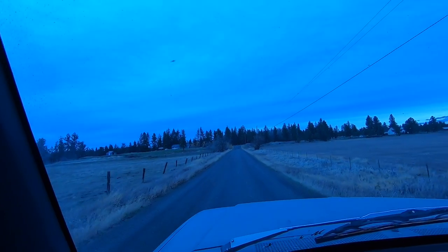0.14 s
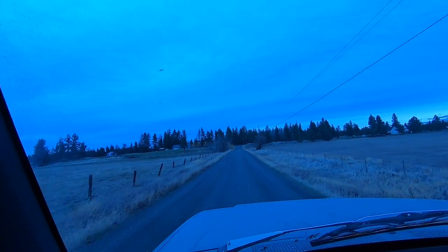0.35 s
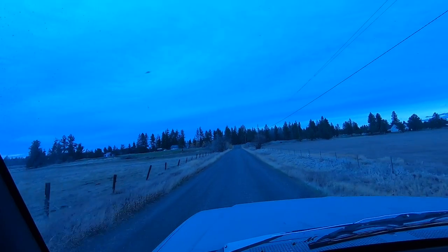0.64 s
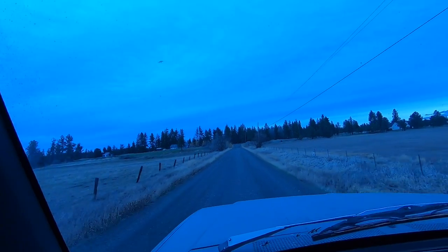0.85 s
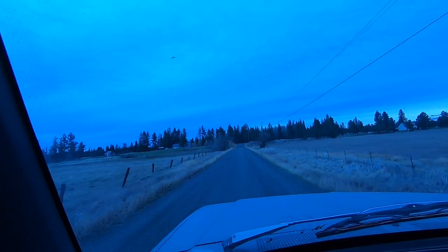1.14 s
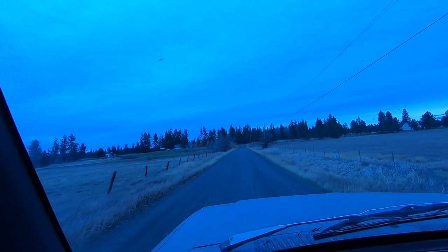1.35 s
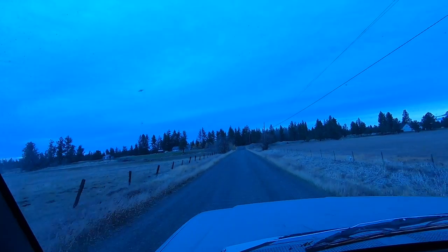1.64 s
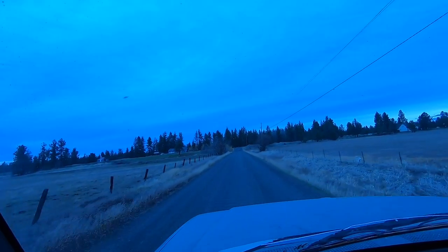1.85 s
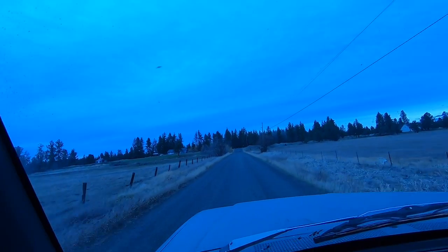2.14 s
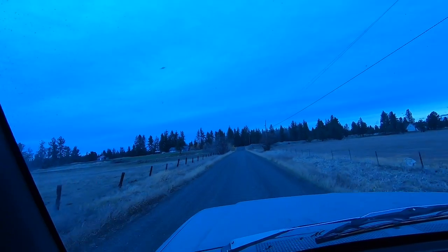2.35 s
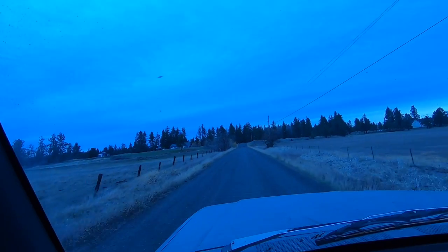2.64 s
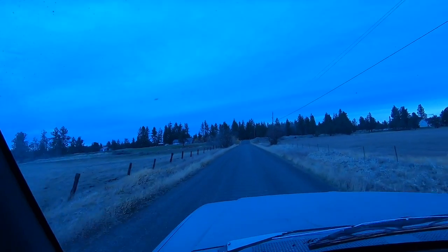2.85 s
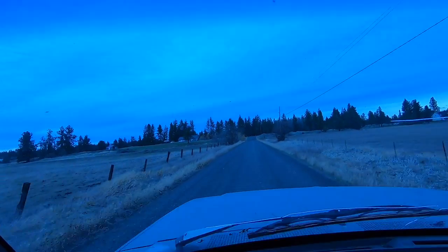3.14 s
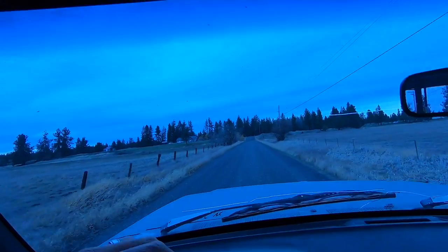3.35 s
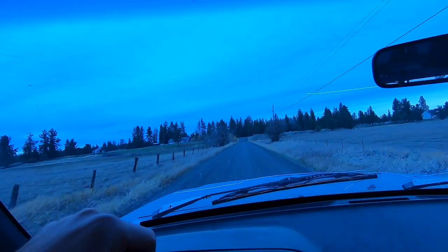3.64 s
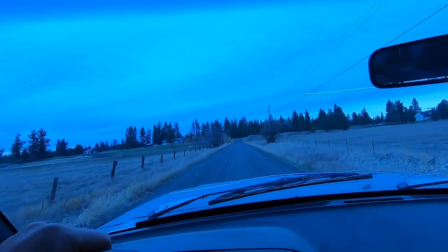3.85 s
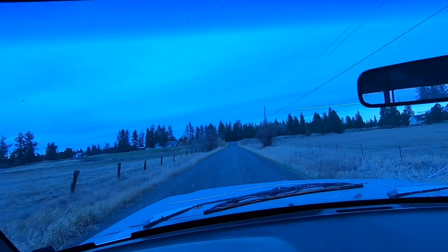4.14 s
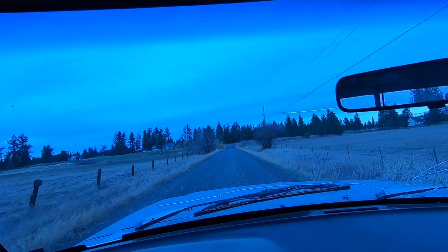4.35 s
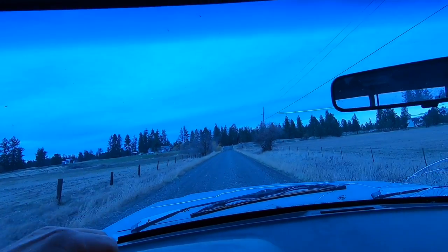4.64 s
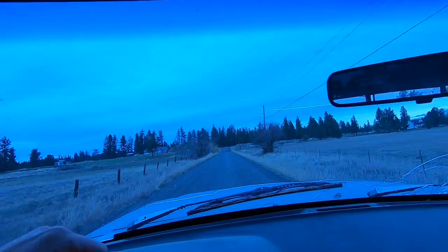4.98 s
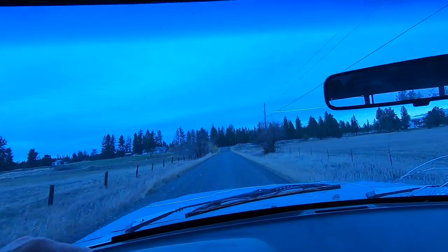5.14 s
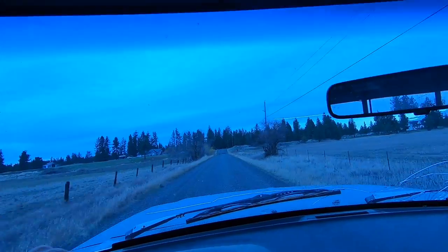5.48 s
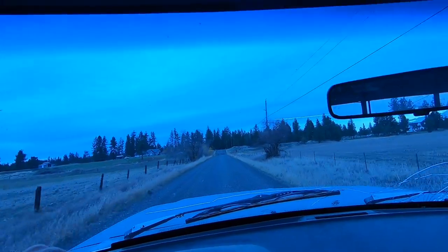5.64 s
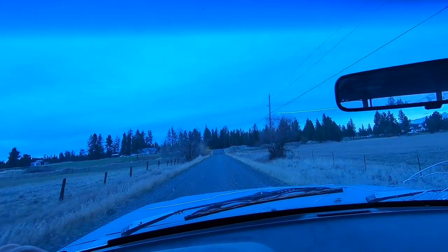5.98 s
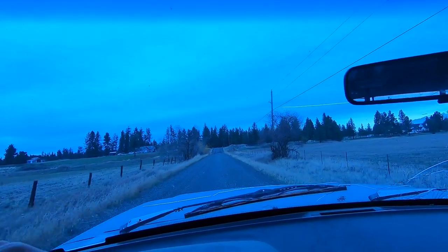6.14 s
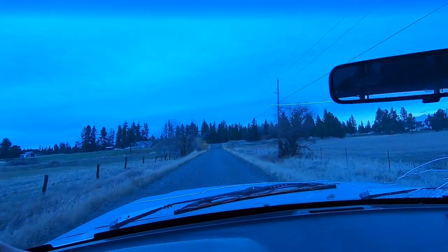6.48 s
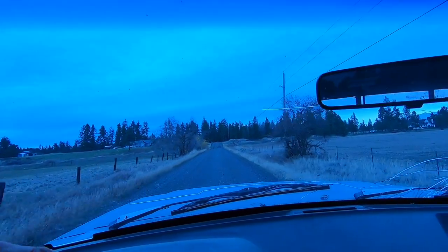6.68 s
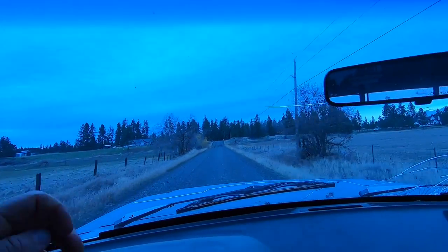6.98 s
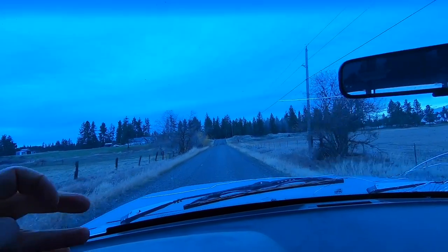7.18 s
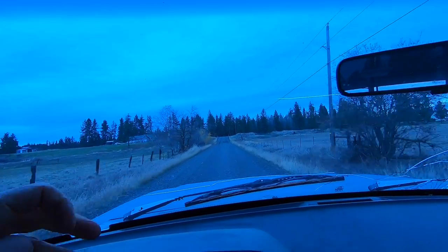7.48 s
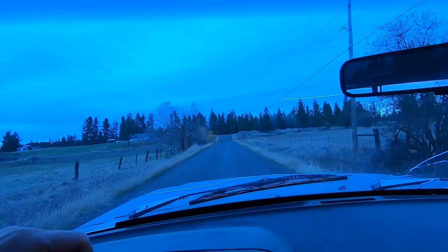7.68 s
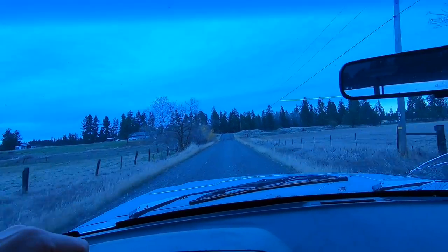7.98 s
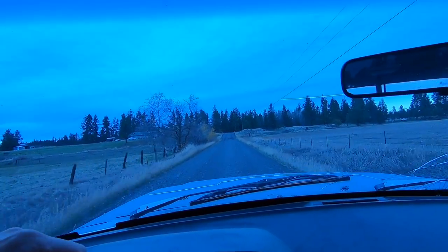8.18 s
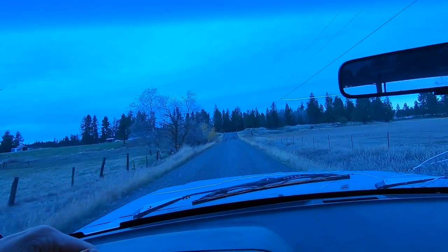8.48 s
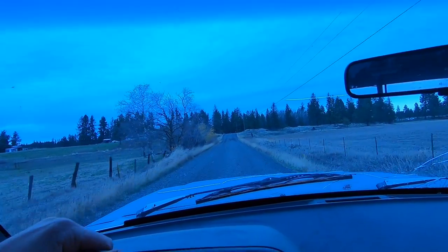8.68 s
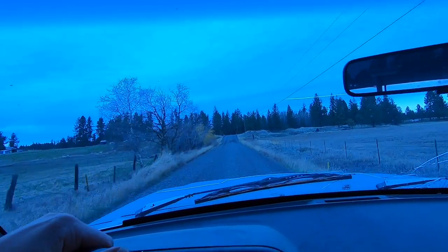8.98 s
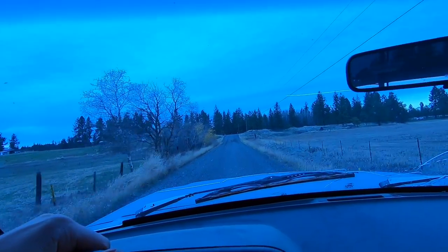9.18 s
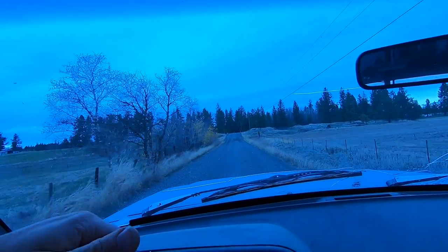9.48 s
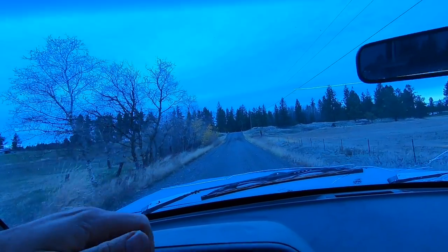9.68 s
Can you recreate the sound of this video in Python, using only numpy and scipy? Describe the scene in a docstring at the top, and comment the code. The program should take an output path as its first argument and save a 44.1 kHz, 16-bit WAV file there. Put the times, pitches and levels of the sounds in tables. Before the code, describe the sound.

A loud, unmuffled V8 truck engine is heard from inside the cab while driving along a country road. It starts at high revs, booming and rasping, with a panel ringing along. At about 0.6 seconds the throttle lifts and the pitch falls steeply for a gear change. The exhaust burbles unevenly and pops repeatedly until about 2.2 seconds. The engine then takes up the load at a lower pitch, while a latch gives a run of sharp metallic knocks and a panel sings thinly until about 3.6 seconds. From there the engine pulls steadily, its deep, throbbing drone rising slowly in pitch and growing a little louder until the end, near 10 seconds. Pulsing exhaust hiss and chattering trim ride on top, with small ticks near 3.5, 5.5 and 9.5 seconds. Low road rumble swells underneath throughout.

```python
"""A V8 truck's unsilenced exhaust, heard in the cab on a country road: it revs out, drops through a gear
change with unburnt fuel popping in the pipes, then pulls up slowly. The firings repeat every engine
cycle, so they form a harmonic series of orders, which boom through the resonances of the cab. Gas
roars and hisses, panels buzz and sing, trim chatters once a cycle, and a latch knocks as the driveline
takes up. Beneath it all the body rumbles on the road and axle hop thrums in the frame."""
import sys
import numpy as np
from scipy import signal
from scipy.fft import rfft, irfft
from scipy.io import wavfile
from scipy.ndimage import uniform_filter1d, minimum_filter1d

SR = 44100
rng = np.random.default_rng(int(sys.argv[2]) if len(sys.argv) > 2 else 0)


def transcribe(u):
    """Save the signal u as a 16-bit wav file named by the first command-line argument.

    u: samples, shape (n,) or (channels, n), limited to [-1, 1]; the rate is SR.
    q: integer samples, one column per channel.
    """
    v = np.clip(np.atleast_2d(u).T, -1, 1)
    q = np.round(v * 32767).astype(np.int16)
    wavfile.write(sys.argv[1], SR, q)


N = 433062
T = np.arange(N) / SR
HZ = np.maximum(np.arange(N // 2 + 1) * SR / N, 1)

# Revving out, gear change, steady pull. Each row: time in seconds, engine cycles in Hz, throttle 0-1.
ENGINE = [(0, 19.0, 1), (.5, 20.0, 1), (.6, 19.7, .5), (.75, 18.7, .1), (.9, 16.6, .05), (1.03, 9.9, 0),
          (1.2, 11.0, 0), (1.45, 9.1, 0), (1.65, 10.5, 0), (1.9, 11.2, 0), (2.2, 11.5, .5), (2.4, 10.8, .6),
          (2.6, 10.9, .7), (3.7, 11.8, .88), (4.5, 12.3, 1), (8.5, 14.68, 1), (9.0, 14.95, 1),
          (9.82, 14.97, .8)]
# Base levels. Each row: time in seconds, then boom, upper orders with rasp, roar and hiss, each in dB.
LEVELS = [(0, -7.5, -22, -21.5, -31), (.35, -7, -21, -24.5, -32.5), (.58, -16.5, -27.5, -34.5, -42.5),
          (.84, -15.5, -32, -33, -42.5), (1.2, -13.5, -30, -37, -45), (1.47, -14.5, -33, -41, -49),
          (1.62, -16.5, -34, -42.5, -47.5), (1.85, -12, -28.5, -37, -42), (1.93, -19, -32, -38.5, -47.5),
          (2.02, -12, -29, -37, -45.5), (2.4, -14, -33, -33, -41), (2.85, -16, -29, -31.5, -37),
          (3.2, -16, -35, -34.5, -40), (3.6, -13.5, -34.5, -34.5, -37), (4.05, -13, -34, -34, -38),
          (4.35, -15, -37.5, -35.5, -40.5), (6, -13, -35.5, -36, -40), (7.5, -12, -33, -33, -37.5),
          (9.25, -11, -30.5, -32.5, -37), (9.82, -9, -30, -31, -39.5)]
# Eight firings a cycle from two uneven banks.
# Each row: multiple of the cycle rate, relative level in dB at low revs, the same at high revs.
ORDERS = [(1, -16, -16), (2, -6, -9), (3, 1, -1), (4, 1.5, -3), (5, -4, -9), (6, -18, -16), (7, -7, -7),
          (8, -2, -1.5), (9, -14, -11), (10, -5, -10), (11, -7, -9), (12, -12, -15), (13, -7, -10),
          (14, -20, -11), (15, -11, -18), (16, -17, -27), (17, -22, -28), (18, -16, -11), (19, -20, -22),
          (20, -19, -25), (21, -14, -23), (22, -13, -6), (23, -24, -23), (24, -18, -27)]
# Higher orders that stand out. Each entry: multiple of the cycle rate.
STRONG_ORDERS = [27, 28, 30, 33, 34, 37, 38, 39, 45, 47, 48, 49, 50, 54, 55, 57, 59, 60, 62, 64, 66, 67]
# Transmission of the exhaust into the cab. Each row: frequency in Hz, gain in dB.
CAB_GAIN = [(15, -20), (20, -12), (24.5, -4), (30, -15), (35, -10), (39, -6), (44, -2), (51, 1.5), (58, -2),
            (63, -7), (70, -5), (78, -9), (90, -5), (100, -6), (120, -2), (135, -5), (152, -2), (161, -3),
            (169, -9.5), (185, -19), (215, -13), (228, -19), (260, -15), (295, -12), (315, -8), (350, -18),
            (405, -12), (430, -16), (462, -10), (500, -14), (560, -14), (625, -20), (715, -9), (780, -16),
            (850, -11), (950, -14), (1300, -26)]
# Spectra of roar, gas hiss and road rumble. Each row: frequency in Hz, relative density in dB.
ROAR_SPECTRUM = [(210, -10), (350, -10), (554, -7), (618, -12), (694, -11.5), (945, -9.5), (1140, -9.5),
                 (1240, -8.5), (1800, -16), (2340, -46.5), (3960, -120)]
HISS_SPECTRUM = [(880, -37.5), (1500, -16.5), (1850, -3.5), (2100, -1), (2700, -4.5), (3500, -5.5),
                 (4400, -12), (6300, -15.5), (7600, -15.5), (8500, -18.5), (9600, -23), (10300, -30),
                 (10900, -43.5), (14000, -76.5), (22000, -120)]
ROAD_SPECTRUM = [(14, -20), (22, -3), (36, 0), (60, -9), (100, -14), (160, -18), (190, -32), (300, -50),
                 (1500, -110)]
# Fuel popping in the pipes. Each row: start in seconds, crack in dB, thud in dB, T60 in seconds.
POPS = [(0.518, -55.5, -27, 0.12), (0.731, -32.5, -32.5, 0.26), (0.7804, -41, -35, 0.033),
        (0.819, -38, -39, 0.11), (0.92, -59, -33, 0.12), (1.1317, -36, -32, 0.29),
        (1.193, -38.5, -31.5, 0.38), (1.283, -46.5, -33.5, 0.17), (1.295, -42.5, -33, 0.4),
        (1.307, -31, -43, 0.14), (1.338, -44, -34, 0.21), (1.367, -50, -33, 0.26),
        (1.5173, -34, -26.5, 0.18), (1.573, -44, -34.5, .12), (1.6645, -35.5, -25.5, 0.08),
        (1.76, -42, -27.5, 0.064), (1.86, -33.5, -28.5, 0.12), (2.167, -36, -27.5, 0.13),
        (2.203, -38.5, -33.5, 0.19), (2.9756, -68, -27, 0.13)]
# Modes of the buzzing panels. Each row: frequency in Hz, width in Hz, relative strength in dB.
PANEL_MODES = [(416, 14, -20), (650, 300, 4), (970, 110, -18.5), (1248, 8.6, 9.5), (1760, 11, 0),
               (2300, 60, -18), (3080, 44, -18.5), (3300, 59, -17), (5820, 600, -38.5), (7600, 600, -32.5)]
# A panel singing under load at low speed. Each row: start and end in seconds, pitch in Hz, level in dB.
SING_SPELLS = [(-.3, .95, 430, -40), (-.3, 0.647, 1260, -33), (-.3, .8, 1357, -42), (-.3, .6, 920, -44.5),
               (-.3, .6, 1640, -47), (1.9, 3.595, 1246, -44)]
# Loose trim. Each row: frequency in Hz, width in Hz, relative level in dB, place in the cycle 0-1,
# offset in dB until the late pull.
TRIM_MODES = [(712, 83, -11, 0.8, -3.5), (964, 60, 3, 0.15, -1), (2273, 75, -3.5, 0.43, -3),
              (2395, 63, -5, 0.47, 0.5), (3042, 63, -8, .42, -1.5), (3100, 56, -10, 0.3, 2.5),
              (3414, 89, -11.5, .34, -0.5), (3487, 65, -6.5, 0.38, -1), (1789, 31, -3, 0, -3),
              (1926, 34, -12.5, .05, -3), (5380, 340, -14, 0, 0), (7650, 980, -10, 0.2, 0)]
# Knocks on the latch. Each row: start in seconds, knock level in dB, ping in Hz, ping level in dB.
KNOCKS = [(0.786, -43, 4530, -43), (.822, -48, 4700, -42), (1.149, -46, 6700, -41),
          (1.197, -51.5, 6400, -41), (1.521, -45, 5700, -46), (1.724, -43, 4480, -57),
          (2.062, -36, 4520, -55), (2.2394, -35.5, 4100, -39), (2.272, -34, 4500, -45),
          (2.326, -30, 4590, -41), (2.369, -31, 4550, -38), (2.417, -31, 4450, -42),
          (2.469, -45, 4440, -51), (2.504, -29, 4450, -45), (2.554, -26.5, 6700, -48),
          (2.684, -35.5, 4400, -46), (2.762, -30.5, 4540, -44), (2.807, -34.5, 5000, -48),
          (2.84, -36, 4570, -52), (2.923, -39, 4500, -56), (3.011, -46, 5500, -50), (3.097, -34, 5900, -47),
          (3.262, -45, 4500, -46), (3.388, -28, 7800, -44), (3.48, -38.5, 6200, -47),
          (3.597, -33.5, 5000, -48)]
# Modes of the latch. Each row: frequency in Hz, width in Hz, relative level in dB.
LATCH_MODES = [(1740, 200, 13.5), (3460, 1400, 0), (4480, 430, -5), (6470, 690, -9)]
# Sharp ticks in the cab. Each row: start in seconds, level in dB.
TICKS = [(3.437, -42), (3.5241, -41.5), (5.549, -34), (9.4799, -46)]
# The field at two listening points. Each row: frequency in Hz, incoherent share 0-1,
# left minus right level in dB, left phase lead in radians.
STEREO_FIELD = [(30, 0, .8, .42), (60, 0, .5, .33), (125, .01, 0.15, 0.11), (252, 0.02, 1.5, 0.08),
                (480, .08, -2.5, 0.6), (1000, .6, -4, 1.15), (2000, 0.25, -2.5, 1.1), (4060, 0.6, -3, .5),
                (8500, .9, -3.3, 0.34)]

FIRING_PLACE, FLIP_ORDER, LOCKED_ORDERS = .13, 9, 13  # place of the hardest firing in the cycle, 0-1
TOP_ORDER, SHELF_DB, HIGH_REVS_HZ = 76, -28.5, (15.5, 18.5)
SPEED_BUILDS_S, LATE_PULL_S = (1.7, 4.76), 6.5  # road speed builds in the new gear
LIMIT_DB, LIMIT_SLOPE = -7.3, .85


def exhaust(cycle_hz, turns, throttle, boom_db, bark_db):
    """Periodic firing gives a line spectrum; random differences between firings add noise to it."""
    lurch_db = (.6 + 1.8 * (1 - throttle)) * walk(7)
    low, high = engine_orders(cycle_hz, turns, throttle)
    firing = (8 * turns).astype(int)
    kicks = np.diff(firing, prepend=0) * rng.standard_normal(firing[-1] + 1)[firing]
    burble = colour(kicks, undb(at_hz(CAB_GAIN, HZ)) * (HZ < 185) / (1 + (HZ / 120) ** 2))
    uneven = undb(-20.5 + 17.6 * (1 - throttle))
    boom = (low + uneven * burble) / np.sqrt(1 + uneven ** 2)
    rasp = colour(rng.standard_normal(N) + 5.4 * kicks, (HZ > 186) / (1 + (HZ / 330) ** 6))
    steady = .3 + .66 * throttle
    bark = steady * high + np.sqrt(1 - steady ** 2) * rasp
    return undb(lurch_db) * (undb(boom_db) * boom + undb(bark_db) * bark)


def engine_orders(cycle_hz, turns, throttle):
    """Source and filter: harmonics pass the cab's response; a low and a high band, each at rms 1."""
    step = 10  # low frequencies need only a tenth of the sample rate
    cycle_hz, turns, slack = cycle_hz[::step], turns[::step], 1 - throttle[::step]
    revs = np.interp(cycle_hz, HIGH_REVS_HZ, [0, 1])
    low, high = 0, 0
    for k, low_revs_db, high_revs_db in ORDERS + upper_orders():
        db = low_revs_db + revs * (high_revs_db - low_revs_db) + at_hz(CAB_GAIN, k * cycle_hz)
        # off throttle the higher orders weaken and every order wavers more
        db += slack * (-5 * (k > 4) - 8 * (k > 24) + (3 + 3 * (k > 4)) * walk(10)[::step])
        db += (.7 + 2 * (k > 13)) * walk(3 - 2 * (k > 13))[::step]
        if k > len(ORDERS):
            db += np.interp(T[::step], SPEED_BUILDS_S, [-14, 0])
        # low orders peak together on the hardest firing; a cab mode flips those above it
        phase = .5 * (k > FLIP_ORDER) + (.1 if k <= LOCKED_ORDERS else 1) * rng.standard_normal()
        order = undb(db) * np.cos(2 * np.pi * (k * (turns - FIRING_PLACE) + phase))
        high_share = np.clip((k * cycle_hz - 170) / 25, 0, 1)
        low, high = low + (1 - high_share) * order, high + high_share * order
    bands = (x / np.sqrt(uniform_filter1d(x ** 2, SR // step // 3)) for x in (low, high))
    return (signal.resample_poly(x, step, 1, window=("kaiser", 12), padtype="line")[:N] for x in bands)


def upper_orders():
    """The harmonic series continues past ORDERS, sinking to a shelf from which some orders stand out."""
    k = np.arange(len(ORDERS) + 1, TOP_ORDER + 1)
    db = SHELF_DB + 6 * np.exp(-(k - k[0]) / 10) + 9 * np.isin(k, STRONG_ORDERS)
    db += rng.standard_normal(len(k))
    return list(zip(k, db, db))


def roar(turns, level_db):
    """Broadband noise drives the panel modes and pulses once a cycle."""
    noise = colour(stereo_noise(), undb(at_hz(ROAR_SPECTRUM, HZ)) * panel_gain())
    middle = irfft(rfft(noise) * resonance(840, 550), N)
    noise -= np.interp(T, [3.0, 3.6], [.5, 0]) * middle  # the middle is thin until road speed builds
    gain = undb(level_db + .8 * walk(30) + .5 * walk(3))
    return noise * gain * cycle_pulse(turns + .5, depth=.6, decay_cycles=.2, scatter_db=2)


def gas_hiss(turns, throttle, level_db):
    """Flow noise, coloured by the panels, is amplitude-modulated by one sharp spurt a cycle."""
    noise = colour(stereo_noise(), undb(at_hz(HISS_SPECTRUM, HZ)) * panel_gain())
    gain = undb(level_db - 2.96 * (1.5 - throttle) + 1.65 * walk(40))
    return noise * gain * cycle_pulse(turns + .62, depth=.99, decay_cycles=.053, scatter_db=1)


def pipe_pops():
    """Sudden combustion gives a broadband transient; returns the sound and the envelope of its thuds."""
    start_s, crack_db, thud_db, t60_s = np.transpose(POPS)
    crack = colour(stereo_noise(), undb(at_hz(HISS_SPECTRUM, HZ) - 1.1 * np.log2(HZ / 4000)))
    thud_gain = undb(at_hz(ROAR_SPECTRUM, HZ) + 3.2 * np.log2(HZ / 1000))
    thud = colour(stereo_noise(), thud_gain * (1 + 1.8 * resonance(690, 120)))
    body = colour(rng.standard_normal(N), resonance(258, 330))
    crack_env = bursts(start_s, crack_db, t60_s, rise_s=.005)
    thud_env = bursts(start_s, thud_db, t60_s, rise_s=.005)
    return crack * crack_env + (thud + body) * thud_env, thud_env


def panel_gain():
    """Each panel mode adds a resonant peak to a flat transmission path."""
    return 1 + sum(undb(db - 7) / np.abs(1 + 2j * (HZ - hz) / width) for hz, width, db in PANEL_MODES)


def trim_chatter(turns, throttle, level_db):
    """Forced vibration: each piece of trim, shaken once a cycle, rings in its own band."""
    noise = rfft(stereo_noise())
    pieces = 0
    for hz, width, db, place, early_db in TRIM_MODES:
        ring = unit(irfft(noise * resonance(hz, width), N))
        shake = cycle_pulse(turns - place + 1, depth=4, decay_cycles=.25, scatter_db=2)
        pieces += undb(db + early_db * (T <= LATE_PULL_S)) * ring * shake
    speed_db = np.interp(T, SPEED_BUILDS_S, [-5.5, -.5])
    return undb(level_db + speed_db - 20 * (1 - throttle)) * unit(pieces)


def singing_panel(pop_env, pop_hz=1234, tonal=.55, fade_s=.15):
    """A lightly damped panel sings in spells of wavering tone and narrowband noise; pops ring it too."""
    def ring(hz):
        return colour(stereo_noise(), resonance(hz, 64 * hz / pop_hz))  # constant Q

    spells = 0
    for start, end, hz, db in SING_SPELLS:
        fade = np.clip(np.minimum(T - start, end - T) / fade_s, 0, 1)
        tone = np.sqrt(2) * np.sin(2 * np.pi * np.cumsum(hz * (1 + .006 * walk(25))) / SR)
        spells += undb(db) * fade * (tonal * tone + np.sqrt(1 - tonal ** 2) * ring(hz))
    return spells * undb(2 * walk(30)) + undb(-18) * pop_env * ring(pop_hz)


def latch_knocks(ring_hz=1700):
    """Impacts excite the latch's modes: a noise burst, a beating pair of partials and a lower ring."""
    modes = sum(undb(db) * resonance(hz, width) for hz, width, db in LATCH_MODES)
    noise = colour(stereo_noise(), .49 * (HZ > 1500) * (HZ < 9000) + modes)
    knocks = noise * bursts(*np.transpose(KNOCKS)[:2], t60_s=.072, rise_s=.004)
    age = T[:SR // 10]
    for start, knock_db, hz, ping_db in KNOCKS:
        pair = np.sin(2 * np.pi * hz * age) + .6 * np.sin(2 * np.pi * 1.03 * hz * age)
        ping = undb(ping_db) * pair + undb(knock_db - 6) * np.sin(2 * np.pi * ring_hz * age)
        knocks[:, int(start * SR):][:, :len(age)] += ping * ring_down(age, t60_s=.07, rise_s=.0015)
    return knocks


def cab_ticks():
    """A fast onset and a treble spectrum make a noise burst sound as a tick."""
    noise = colour(stereo_noise(), resonance(7000, 5500) / (1 + (HZ / 11500) ** 6))
    return noise * bursts(*np.transpose(TICKS), t60_s=.12, rise_s=.00053)


def road_rumble():
    """Random forcing by the road shakes the body at low frequencies, in wide swells."""
    return undb(-23 + 10.74 * walk(2.84)) * colour(stereo_noise(), undb(at_hz(ROAD_SPECTRUM, HZ)))


def axle_thrum():
    """Axle hop is a narrow, randomly driven resonance that thrums in the frame."""
    return undb(-34 + 1.5 * walk(4.1)) * colour(rng.standard_normal(N), resonance(24.9, 1.4))


def cycle_pulse(turns, depth, decay_cycles, scatter_db):
    """Amplitude modulation: the loudest cylinders give one jolt of random size a cycle; rms 1."""
    size = undb(scatter_db * rng.standard_normal(int(turns[-1]) + 1))[turns.astype(int)]
    return unit(1 + depth * uniform_filter1d(size * np.exp(-(turns % 1) / decay_cycles), SR // 80))


def ring_down(age, t60_s, rise_s):
    """Damped vibration rises quickly, then decays by 60 dB in t60_s."""
    return (1 - np.exp(-age / rise_s)) * np.exp(-np.log(1000) * age / t60_s)


def bursts(start_s, db, t60_s, rise_s):
    """Superposition of one decaying envelope for each event."""
    env = np.zeros(N)
    for start, gain, t60 in np.broadcast(start_s, undb(db), t60_s):
        first = int(start * SR) + 1
        env[first:][:SR] += gain * ring_down(T[first:][:SR] - start, t60, rise_s)
    return env


def stereo_noise():
    """Noise at two nearby points is coherent in the bass and less so in the treble."""
    share = at_hz(STEREO_FIELD, HZ)
    mid, side = rfft(rng.standard_normal((2, N)))
    return irfft(np.sqrt(1 - share / 2) * mid + np.sqrt(share / 2) * side * np.array([[1], [-1]]), N)


def stereo_image(mix):
    """Level and phase differences between left and right vary with frequency."""
    half, pad = np.array([[.5], [-.5]]), SR // 10
    mix = np.pad(mix, ((0, 0), (pad, pad)), mode="reflect", reflect_type="odd")
    hz = np.maximum(np.arange(mix.shape[1] // 2 + 1) * SR / mix.shape[1], 1)
    gain = undb(at_hz(STEREO_FIELD, hz, column=2) * half)
    lead = at_hz(STEREO_FIELD, hz, column=3) * half
    return irfft(rfft(mix) * gain * np.exp(1j * lead), mix.shape[1])[:, pad:-pad]


def walk(rate_hz):
    """Random levels, each held 1 / rate_hz seconds, smoothed twice; spread near 1."""
    hold = int(SR / 50 / rate_hz)
    held = np.repeat(rng.standard_normal(N // 50 // hold + 2), hold)
    smooth = uniform_filter1d(uniform_filter1d(held, hold), hold)
    return 1.3 * np.interp(T, np.arange(len(held)) * 50 / SR, smooth)


def resonance(hz, width):
    """A Lorentzian peak, used as an amplitude gain."""
    return 1 / np.abs(1 + 2j * (HZ - hz) / width) ** 2


def colour(x, gain):
    """Filtering multiplies the spectrum by a gain; rms 1."""
    return unit(irfft(rfft(x) * gain, N))


def at_hz(table, hz, column=1):
    """Interpolation of a table column on a log-frequency axis."""
    rows = np.array(table)
    return np.interp(np.log(hz), np.log(rows[:, 0]), rows[:, column])


def over_time(table):
    """Linear interpolation of each column between its times."""
    times, *columns = np.transpose(table)
    return (np.interp(T, times, column) for column in columns)


def undb(db):
    return 10 ** (np.asarray(db) / 20)


def unit(x):
    return x / np.sqrt(np.mean(x ** 2))


def scene():
    """The sources superpose in the cab; one engine phase times exhaust, roar, hiss and chatter."""
    cycle_hz, throttle = over_time(ENGINE)
    cycle_hz = uniform_filter1d(cycle_hz, SR // 20, mode="nearest")
    turns = np.cumsum(cycle_hz) / SR  # engine cycles elapsed
    boom_db, bark_db, roar_db, hiss_db = over_time(LEVELS)
    mix = exhaust(cycle_hz, turns, throttle, boom_db, bark_db) + road_rumble()
    mix += roar(turns, roar_db) + gas_hiss(turns, throttle, hiss_db)
    mix += trim_chatter(turns, throttle, hiss_db) + axle_thrum()
    pops, pop_env = pipe_pops()
    mix += pops + latch_knocks() + cab_ticks() + singing_panel(pop_env)
    return stereo_image(mix)


def record(dry):
    """A quick limiter compresses the booms; a low-pass cuts the top and the end closes softly."""
    crest = -minimum_filter1d(-np.abs(dry).max(axis=0), SR // 40)
    gain = uniform_filter1d(np.minimum(1, undb(LIMIT_DB) / (crest + 1e-9)) ** LIMIT_SLOPE, SR // 40)
    fade = np.clip((T[-1] - T) / .006, 0, 1)
    return signal.sosfilt(signal.ellip(10, .2, 70, 15100, fs=SR, output="sos"), dry * gain * fade)


dry = scene()
out = record(dry)
transcribe(out)
```